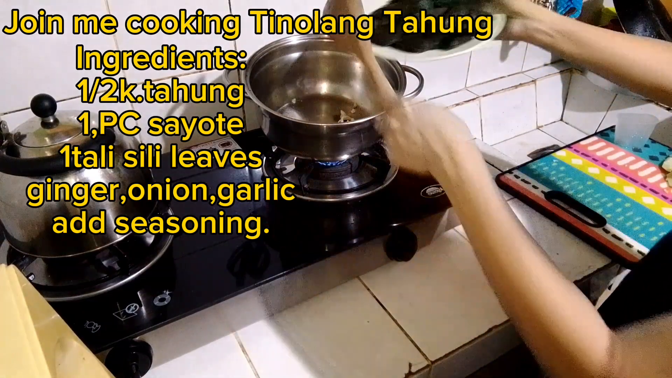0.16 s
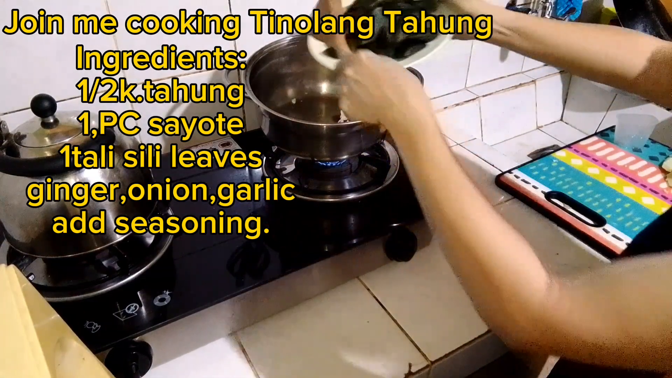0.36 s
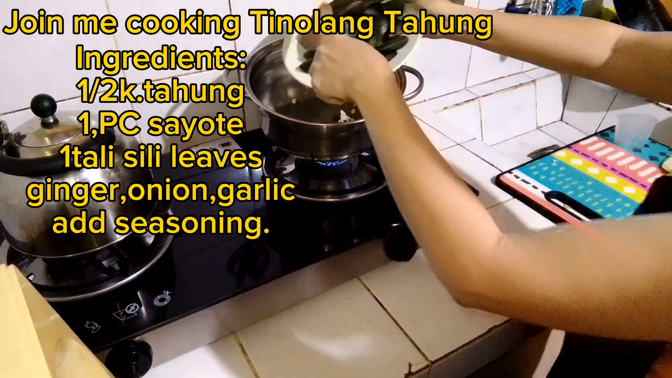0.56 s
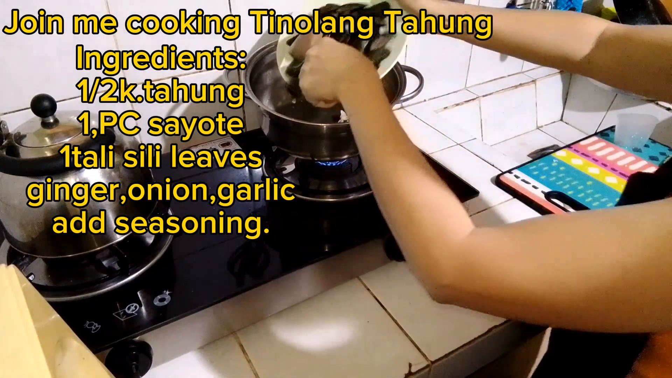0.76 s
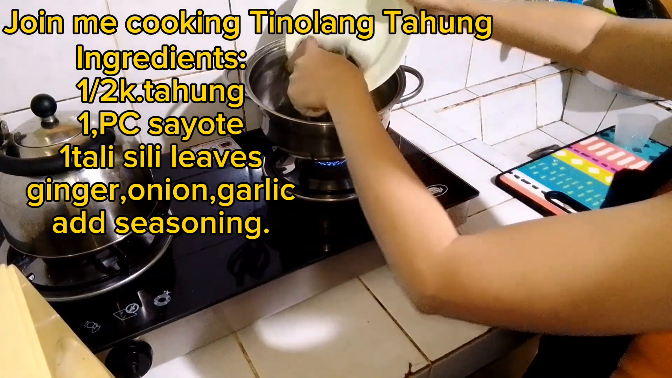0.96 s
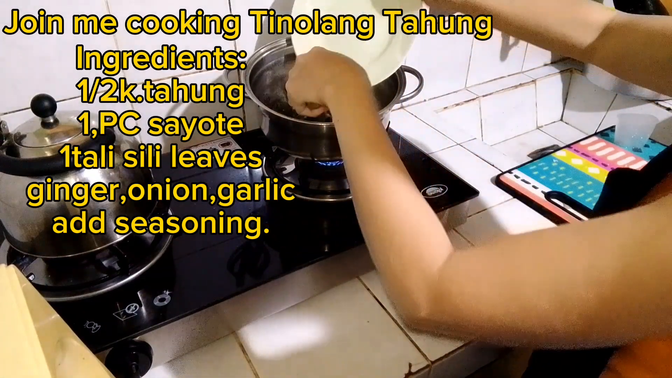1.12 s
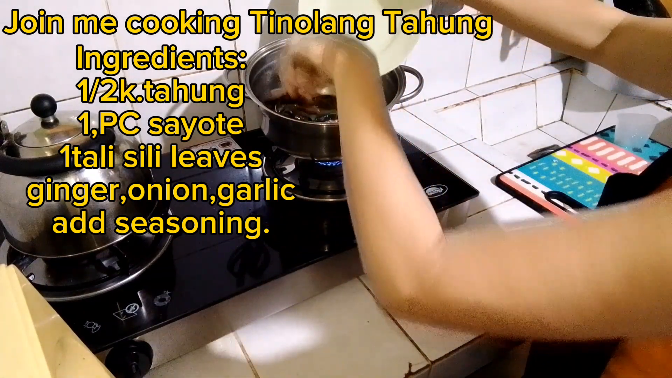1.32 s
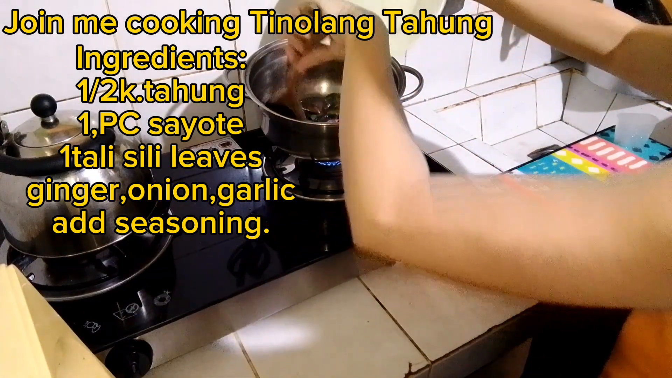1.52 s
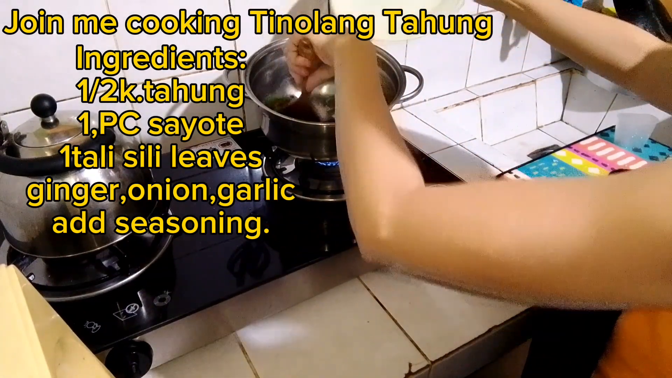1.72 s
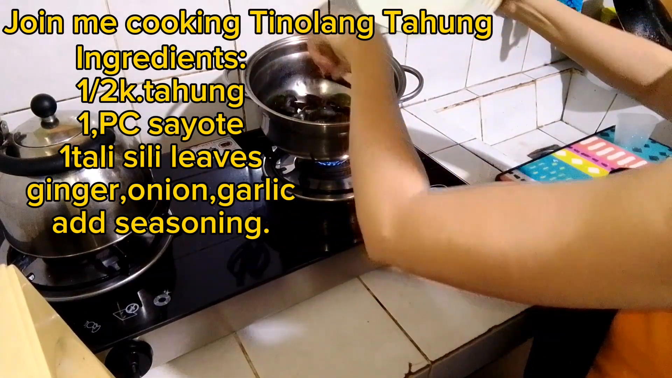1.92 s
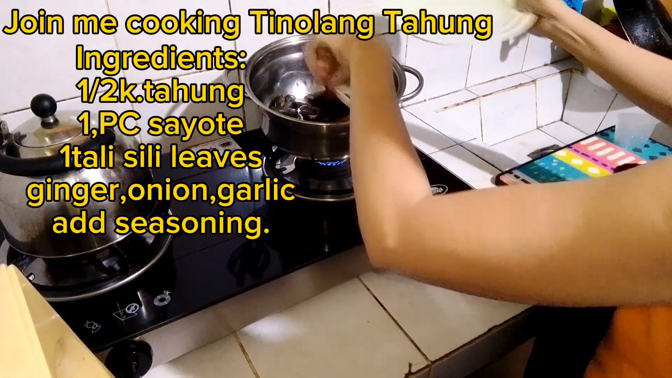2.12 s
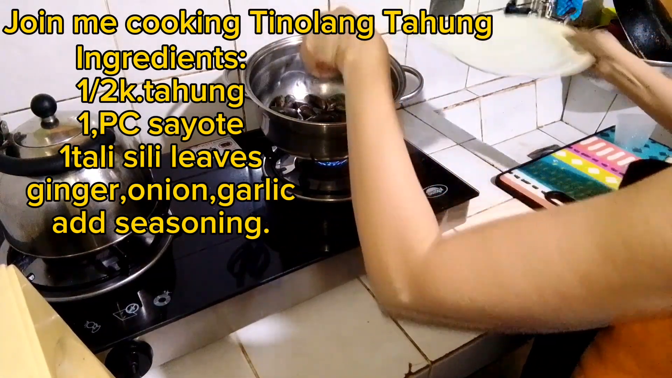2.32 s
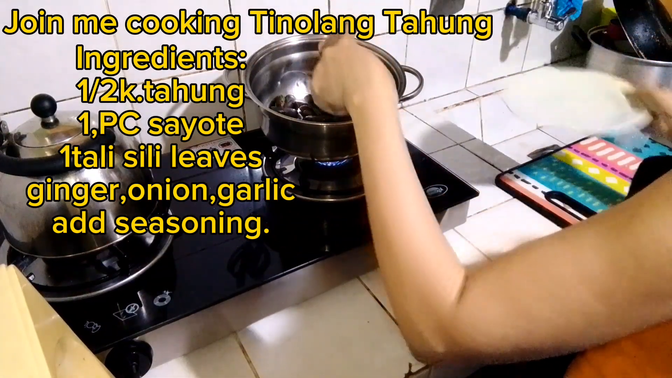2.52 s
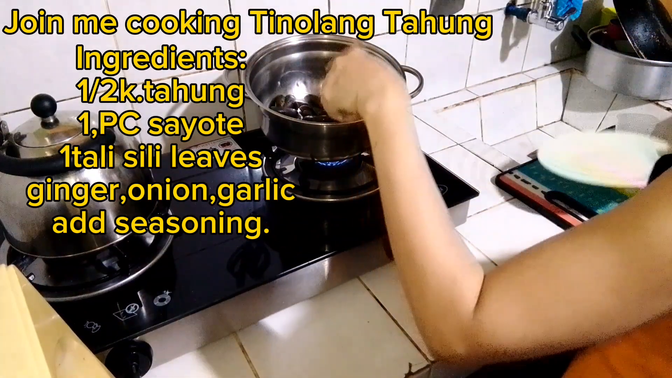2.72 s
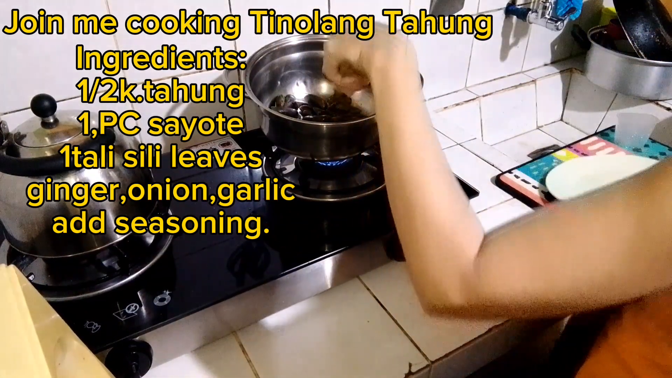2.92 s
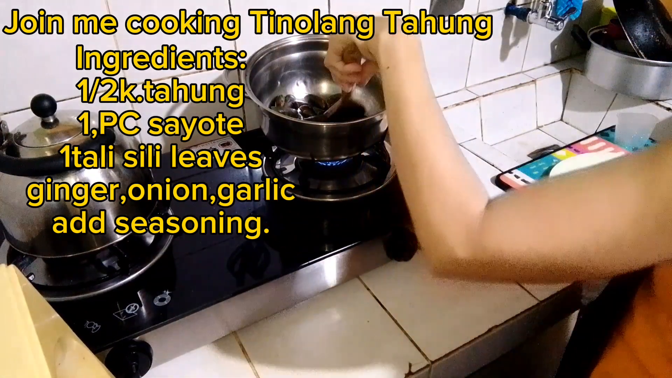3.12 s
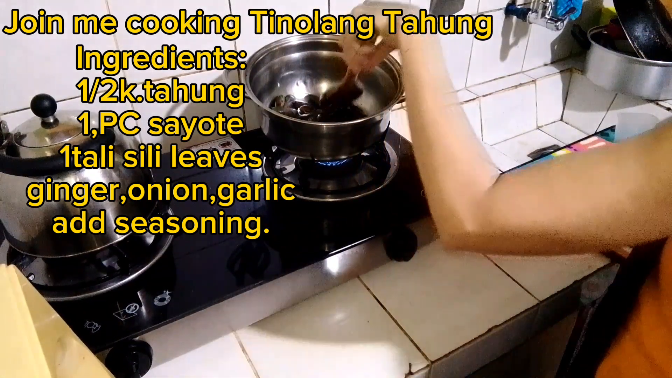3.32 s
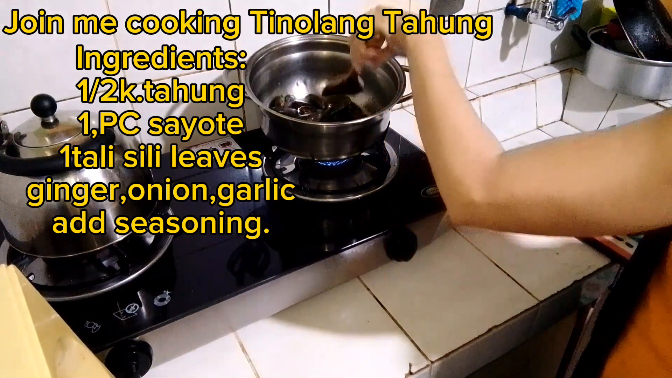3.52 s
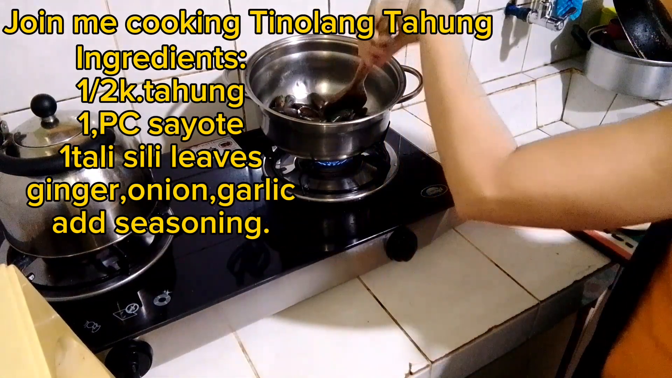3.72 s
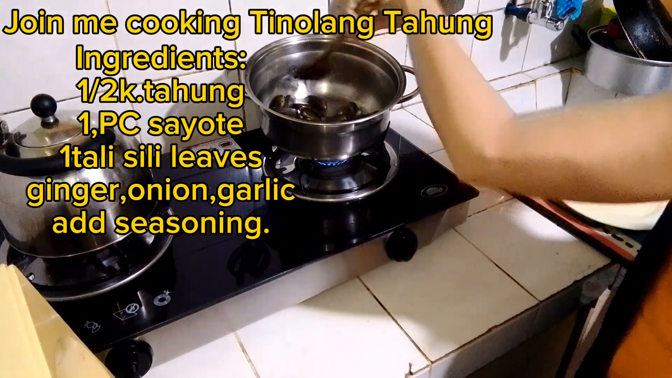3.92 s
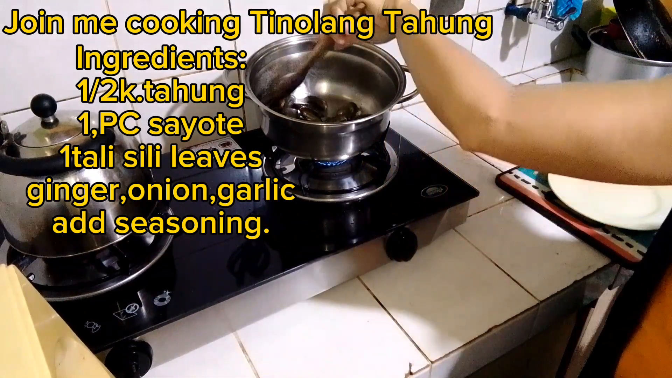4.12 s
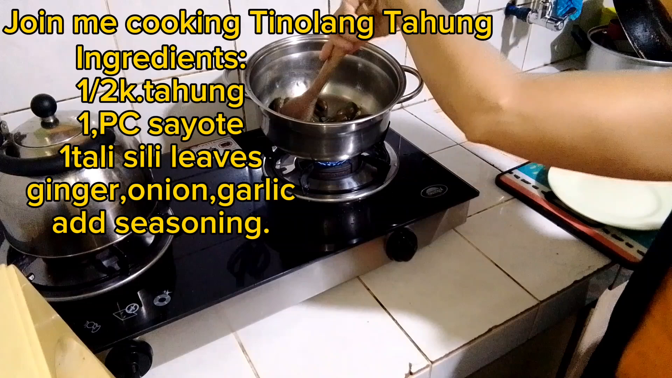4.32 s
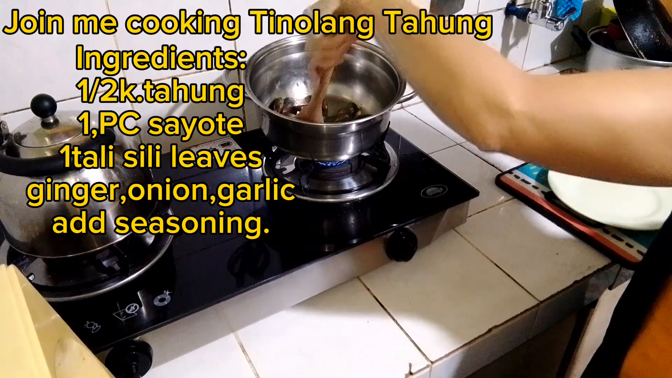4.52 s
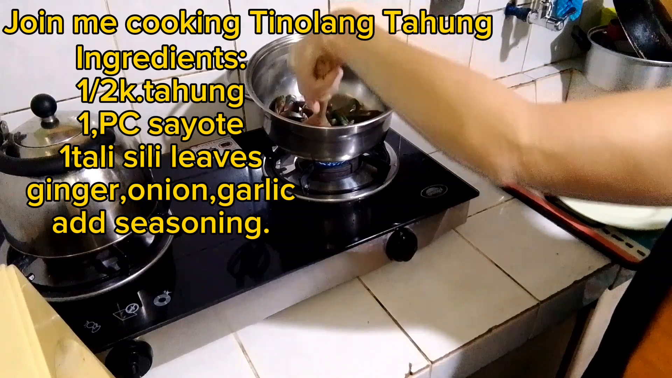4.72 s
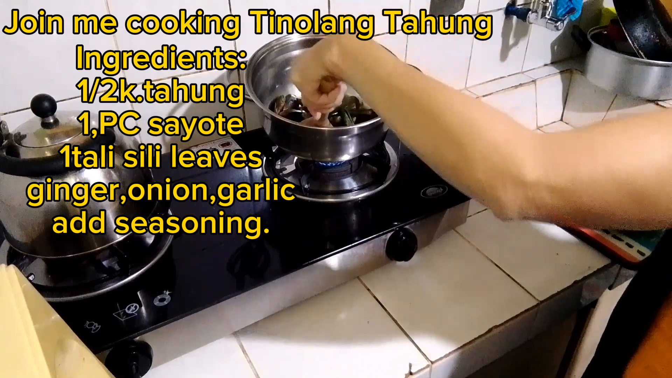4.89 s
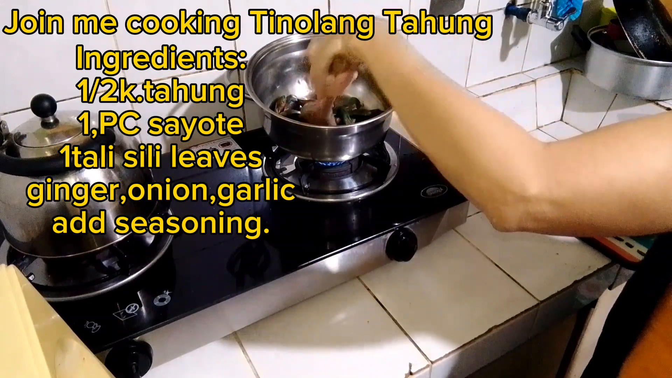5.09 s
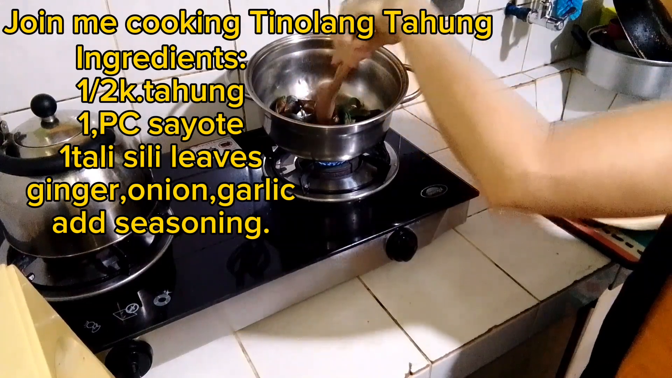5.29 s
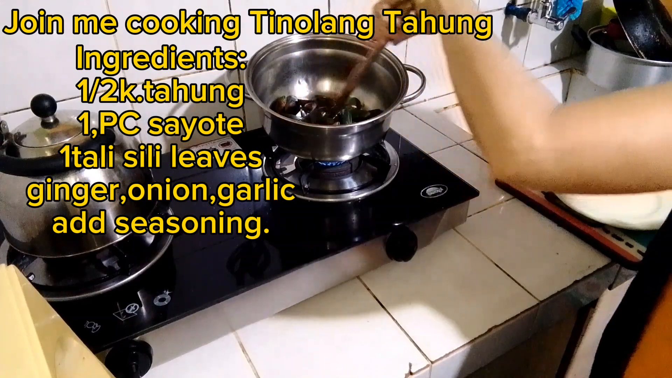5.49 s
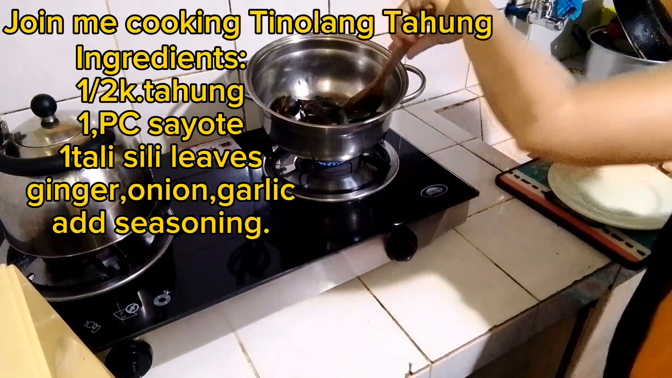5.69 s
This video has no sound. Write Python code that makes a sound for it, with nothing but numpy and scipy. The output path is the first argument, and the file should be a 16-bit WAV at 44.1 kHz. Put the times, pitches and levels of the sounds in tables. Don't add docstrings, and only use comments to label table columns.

```python
import sys
import numpy as np
from scipy import signal
from scipy.fft import rfft, irfft
from scipy.io import wavfile

SR = 44100
rng = np.random.default_rng(int(sys.argv[2]) if len(sys.argv) > 2 else 0)


def dump(signal):
    limited = np.clip(np.atleast_2d(signal).T, -1, 1)
    pcm = np.round(limited * 32767).astype(np.int16)
    wavfile.write(sys.argv[1], SR, pcm)


def volts_from_decibels(level):
    exponent = np.asarray(level, float) / 20
    return 10 ** exponent


N = 253559

# [f/Hz, level/dB, t60/s]
POT_MODES = [(449, -9.5, 0.2), (532.5, 2.5, 0.069), (646, -1, 0.14), (713, 3.5, 0.059), (802, 0, 0.055),
             (860, -2.5, 0.11), (1088, 8.5, 0.03), (1219, 8, 0.036), (1390, 8, 0.01), (1633, -21, 0.029),
             (1542, 1, 0.027), (1740, 15, 0.013), (2040, -10, 0.04)]
# [f/Hz, level/dB, t60/s]
BASE_MODES = [(124, -6, 0.034), (183, -49, 0.052), (227, -16, 0.066), (273.4, -9.5, 0.087),
              (354, -22, 0.095)]
# [f/Hz, level/dB, t60/s]
WALL_MODES = [(2128, -6, 0.066), (2268, -1, 0.043), (2400, -1, 0.05), (2800, -5, 0.058), (3240, -2.5, 0.11),
              (3420, -0.5, 0.068), (3700, -2, 0.044), (3900, -2.5, 0.079), (4130, -11.5, 0.12),
              (4460, -1, 0.092), (4880, -5.5, 0.088), (5370, -3.5, 0.024), (5950, -10.5, 0.083),
              (6350, -1, 0.016)]


def rms_one(x):
    return x / np.sqrt(np.mean(x ** 2) + 1e-20)


def peak_one(x):
    return x / np.abs(x).max()


def butter(x, order, f_hz, kind):
    return signal.sosfilt(signal.butter(order, f_hz, kind, fs=SR, output="sos"), x)


def in_time(rows):
    t_s, *columns = np.transpose(rows)
    return [np.interp(np.arange(N) / SR, t_s, c) for c in columns]


def colour(x, points):
    f_hz, level_db = np.transpose(points)
    grid_hz = np.arange(N // 2 + 1) * SR / N + 1
    gain_db = np.interp(np.log(grid_hz), np.log(f_hz), level_db)
    return rms_one(irfft(rfft(x) * volts_from_decibels(gain_db), N))


def drift(rate_hz):
    r = np.exp(-2 * np.pi * rate_hz / SR)
    wander = signal.lfilter([1], [1, -2 * r, r * r], rng.standard_normal(N + SR))
    return rms_one(wander[SR:])


def ring(force, f_hz, t60_s):
    r = volts_from_decibels(-60 / (max(t60_s, .001) * SR))
    w = 2 * np.pi * f_hz / SR
    return signal.lfilter([0, np.sin(w)], [1, -2 * r * np.cos(w), r * r], force + 1e-18)


def radiated(force, f_hz, t60_s):
    return np.diff(ring(force, f_hz, t60_s), prepend=0)


def struck(modes, force, strengths_db):
    body = 0
    for k, ((f_hz, level_db, t60_s), own_db) in enumerate(zip(modes, strengths_db)):
        body = body + ring(force, f_hz, t60_s) * volts_from_decibels(level_db + own_db) * (-1) ** k
    return peak_one(body)


def grains(per_s, spread_db):
    sizes = volts_from_decibels(spread_db * np.minimum(rng.exponential(1, N), 5)) * rng.choice([-1, 1], N)
    return sizes * (rng.random(N) < per_s / SR)


def fading(t60_s):
    return volts_from_decibels(-60 * np.arange(SR // 3) / SR / max(t60_s, .003))


def add(out, t_s, sound):
    at = round(t_s * SR)
    out[at:at + len(sound)] += sound[:N - at]


def swells(rows, rise_db_per_s, fall_db_per_s):
    t = np.arange(0, N + 32, 32) / SR
    start_s, hold_s, *columns = np.array(rows).T[:, :, None]
    rise_db = -rise_db_per_s * np.maximum(start_s - t, 0)
    fall_db = -fall_db_per_s * np.maximum(t - start_s - hold_s, 0)
    curves = []
    for level_db in columns:
        power = np.sum(volts_from_decibels(level_db + rise_db + fall_db) ** 2, axis=0)
        curves.append(np.interp(np.arange(N) / SR, t, 10 * np.log10(power + 1e-9)))
    return curves


def vigour():
    # [t/s, spitting/dB, fine steam/dB]
    steady_fry = [(0, -39, -36.5), (.62, -39, -37.5), (.7, -35, -39), (.84, -51, -37), (.93, -45, -35),
                  (1.0, -9.5, -16), (1.24, -12, -16.5), (1.3, -21, -19.5), (1.83, -11.5, -9),
                  (2.18, -15.5, -15.5), (2.45, -17, -18), (3.1, -23, -22.5), (3.36, -21.5, -21),
                  (4.23, -20, -16.5), (4.32, -17, -17.5), (5.03, -19, -17), (5.3, -12.5, -11.5),
                  (5.75, -20.5, -16)]
    # [start/s, hold/s, spitting/dB, fine steam/dB]
    flare_rows = [(.645, .01, -44, -32), (.858, 0.018, -14, -40), (.937, 0.0051, -4, -17),
                  (1.0, 0.016, -20, -16), (1.33, 0.083, -17.5, -13), (1.535, 0.012, -11, -30),
                  (1.605, 0.008, -20, -14), (1.7, .01, -12, -22), (2.22, 0.014, -24, -11),
                  (2.283, 0.005, -18, -12), (2.745, 0.025, -20.5, -17), (3.44, .13, -21.5, -15.5),
                  (3.665, 0.024, -17, -16.5), (3.85, 0.17, -21, -16), (4.26, 0.009, -33, -29),
                  (4.719, 0.0056, -30, -16), (5.1, 0.048, -28, -15.5), (5.47, 0.028, -16.5, -11.5),
                  (5.684, .004, -27, -22)]
    flares_db = swells(flare_rows, rise_db_per_s=2500, fall_db_per_s=361)
    return [10 * np.log10(volts_from_decibels(steady_db) ** 2 + volts_from_decibels(flare_db) ** 2)
            for steady_db, flare_db in zip(in_time(steady_fry), flares_db)]


def frying():
    # [f/Hz, level/dB]
    spit_spectrum = [(400, -72), (900, -49), (2000, -14.5), (3000, -3), (4600, 4), (6100, -1.5), (9000, -9),
                     (13000, -36)]
    steam_spectrum = [(5000, -19), (7000, -1), (10000, 0), (11600, -5), (13000, -1)]
    air_hz, air_t60_s, air_db = 1150, 0.0094, -23.5
    spit_db, steam_db = vigour()
    clump = drift(30)

    bursts = grains(8000 * volts_from_decibels(clump), spread_db=-1.0)
    dealt = rng.integers(0, 20, N)
    droplets = 0
    for k, f_hz in enumerate(np.geomspace(600, 12500, 20)):
        droplets = droplets + ring(bursts * (dealt == k), f_hz, 2.67 / f_hz) * np.sqrt(f_hz)

    busy = np.clip((spit_db + 30) / 12, 0, 1)
    pops = grains(70 * busy, spread_db=4.0)
    rattle = signal.lfilter([1], [1, -.985], np.abs(pops)) * rng.standard_normal(N)
    pops = rms_one(butter(pops + volts_from_decibels(-7.5) * rattle, 2, 2500, "high"))

    pot_air = rms_one(radiated(ring(bursts, air_hz, air_t60_s), air_hz, air_t60_s))
    spit = colour(droplets, spit_spectrum) * volts_from_decibels(.5 * clump) + volts_from_decibels(-12.5) * pops + volts_from_decibels(air_db) * pot_air
    steam = colour(grains(12000, spread_db=-7.0), steam_spectrum)
    return spit * volts_from_decibels(spit_db - 1.5) + steam * volts_from_decibels(steam_db - 3 + 0.59 * clump + 1.0 * drift(40))


def big_pops():
    # [t/s, peak/dB]
    pop_rows = [(1.798, -3), (2.1815, 0), (2.29, 0), (2.3646, -4), (2.6483, -3), (2.8012, -4), (3.5665, 0),
                (3.4685, -4), (3.483, -2), (3.5065, -5), (3.5267, -1), (3.6595, -2), (4.0708, -3),
                (4.3312, -3), (4.636, -4), (4.8594, -2), (4.928, -4), (4.721, 1), (4.9816, -1), (5.271, -2),
                (5.6866, 1), (5.3316, -2), (5.521, -2)]
    out = np.zeros(N)
    for t_s, peak_db in pop_rows:
        noise = rng.standard_normal(SR // 3)
        snap = volts_from_decibels(-13) * noise * fading(0.023)
        snap[0] += np.sign(noise[0])
        add(out, t_s, volts_from_decibels(peak_db) * peak_one(butter(snap, 2, [2500, 11000], "band")))
    return out


def clicks():
    # [t/s, peak/dB, ring f/Hz, bright edge/dB]
    pouring = [(.644, -13, 4360, 12), (.7153, -17.5, 3300, -23), (.739, -30, 4400, -25),
               (.7851, -13, 4630, -23), (.8385, 0, 3970, -27), (.863, 3, 3880, -20), (.937, 6, 3240, 7),
               (.9705, -1, 2750, -17), (.9957, 11.5, 6180, -18), (1.0494, 4, 4900, -20),
               (1.1094, 0.5, 3060, -17), (1.2294, -2, 4200, -16), (1.32, -2, 3900, -14),
               (1.3494, -13, 1740, 0), (1.409, 1, 4960, -1), (1.472, -4, 5200, -11),
               (1.524, -2.5, 4850, -22), (1.537, -4, 3500, -7), (1.605, 6.5, 3370, -6),
               (1.7035, 2.5, 5370, -7), (1.9215, 3, 3750, -7), (2.062, 4, 4300, -17), (2.128, 3, 4600, -15),
               (2.176, 6, 4000, -11)]
    settling = [(2.2246, 3.5, 4940, -14), (2.283, 3.5, 4900, -6), (2.647, -0.5, 3240, -8),
                (2.756, 0, 4570, 2), (2.7897, -0.5, 4850, -8), (2.8514, -7, 1750, -15),
                (2.8837, -6.5, 4830, -16), (2.954, -4.5, 4900, 14), (3.064, 3, 2800, -35),
                (3.171, -4.5, 4740, 3), (3.241, -5.5, 3420, -20), (3.271, 1.5, 1930, -25),
                (3.3064, -4, 2430, -19)]
    stirring = [(3.405, 1, 3800, -15), (3.5663, -0.5, 3440, 12), (3.674, 0, 4400, -19),
                (3.758, 3, 1730, -22), (3.8222, 2, 4600, -8), (3.87, -0.5, 3270, -14),
                (3.959, 1.5, 4340, -5), (4.2634, -2, 7100, 15.5), (4.292, 0.5, 2700, -19),
                (4.507, 2.5, 2060, -18), (4.7192, -2.5, 7250, -10), (5.1515, 2.5, 3320, -13),
                (5.223, 4.5, 3250, -28), (5.2998, 1, 5060, -19), (5.354, -4, 4950, -3),
                (5.4043, -1, 3560, -11), (5.47, 1.5, 4300, -11), (5.5823, 2, 4400, -28),
                (5.6626, 0.5, 2230, -2), (5.6856, -9, 4930, 5)]
    out = np.zeros(N)
    tick = peak_one(np.diff(ring(fading(.003)[:SR // 6], 4200, .0015), 2))
    fade = fading(0.052)[:SR // 6]
    for t_s, peak_db, f_hz, edge_db in pouring + settling + stirring:
        dull, sharp = fade * rng.standard_normal((2, SR // 6))
        shell = peak_one(radiated(dull, f_hz, 0.0052))
        crack = peak_one(butter(sharp, 2, 5500, "high"))
        wall = struck(WALL_MODES, dull, 3.3 * rng.standard_normal(len(WALL_MODES)))
        add(out, t_s, volts_from_decibels(peak_db - 6.5) * (shell + volts_from_decibels(edge_db - 10.5) * crack + volts_from_decibels(-5.5) * wall))
        add(out, t_s, volts_from_decibels(peak_db - 3) * tick)
    return butter(out, 2, 900, "high")


def clinks():
    # [t/s, peak/dB, f/Hz, t60/s]
    clink_rows = [(0.736, -21, 4360, 0.1), (.74, -24, 2220, 0.04), (.842, -7.5, 4980, 0.03),
                  (0.867, -3, 4370, 0.06), (0.943, -15, 3200, 0.048), (.95, -9.5, 2197, 0.82),
                  (.97, -0.5, 2735, 0.055), (0.973, -2.5, 5670, 0.021), (1.02, -6, 2236, 0.067),
                  (1.031, -5, 3240, 0.14), (1.05, -18, 4880, 0.11), (1.119, -12, 3186, 0.23),
                  (1.225, -13.5, 2800, 0.26), (1.347, -11.5, 1740, 0.043), (1.375, -14, 1740, 0.092),
                  (4.504, -10.5, 2800, 0.036), (4.71, -17, 2250, 0.032)]
    out = np.zeros(N)
    for t_s, peak_db, f_hz, t60_s in clink_rows:
        shake = rng.standard_normal(SR // 3) * fading(0.079)
        add(out, t_s, volts_from_decibels(peak_db) * peak_one(radiated(shake, f_hz, t60_s)))
    return out


def shaken(modes, contacts, level_db):
    body = 0
    for f_hz, mode_db, t60_s in modes:
        force = contacts * rng.standard_normal(N) * volts_from_decibels(mode_db + 2.1 * drift(9))
        body = body + ring(force, f_hz, t60_s)
    return volts_from_decibels(level_db) * rms_one(body)


def tumbling():
    # [start/s, hold/s, rumble of pot/dB, rattle of shell on steel/dB]
    shifts = [(.715, 0.15, -37.5, -23), (.839, 0.074, -28, -8), (.938, 0.28, -13.5, -10.5),
              (1.27, 0.091, -20, -14.5), (1.45, 0.26, -19.5, -15.5), (1.76, 0.11, -20.5, -12),
              (1.85, 0.033, -18, -12), (1.93, .15, -19.5, -16), (2.09, 0.054, -16.5, -14),
              (2.2, 0.84, -45, -20.5), (3.064, 0.0071, -4, -10), (3.272, 0.046, -11.5, -14),
              (3.4, 0.22, -50, -25), (3.67, 0.13, -15, -16), (3.82, 0.069, -15.5, -18.5),
              (3.9, 0.18, -28, -19), (4.14, 0.078, -27.5, -22.5), (4.28, 0.094, -17, -9.5),
              (4.44, 0.072, -24.5, -13.5), (4.506, 0.01, -35, -9.5), (4.56, 0.37, -26.5, -23),
              (4.8, 0.025, -39, -38), (4.9, 0.2, -36, -17), (5.1, 0.11, -24, -14.5),
              (5.25, 0.21, -28, -13.5), (5.46, 0.17, -28.5, -18), (5.62, 0.15, -31.5, -17.5)]
    rumble_db, rattle_db = swells(shifts, rise_db_per_s=5000, fall_db_per_s=200)
    full = np.clip((np.arange(N) / SR - 1.7) * 5, 0, 1)
    pot_contacts = grains(900 * volts_from_decibels(1.5 * drift(20)), spread_db=2.5)
    wall_contacts = grains(2500 * volts_from_decibels(1.5 * drift(20)), spread_db=2.5)
    rumble = shaken(POT_MODES + BASE_MODES, pot_contacts, rumble_db - 8.5)
    rattle = shaken(WALL_MODES, wall_contacts, rattle_db - 9.5 - 1 * full)
    scrape = rms_one(butter(wall_contacts, 2, [1300, 3300], "band"))
    return rumble + rattle + volts_from_decibels(rattle_db - 15.0 + 0.5 * full) * scrape


def knocks():
    # [t/s, peak/dB, thud/dB, length/s, main ring f/Hz]
    knock_rows = [(0.932, -17, 3, 0.21, 710), (1.133, -5, -27, 0.12, 820), (1.186, 0.5, -13, 0.33, 670),
                  (1.34, -2.5, -22, 0.057, 707), (1.376, -4, -31, 0.2, 683), (1.665, -15, 0.5, 0.074, 810),
                  (1.752, -12, -11, 0.21, 1160), (1.844, -7.5, -25, 0.11, 1090),
                  (2.103, -4.5, -15, 0.15, 1076), (3.064, 4.5, -5, 0.073, 960),
                  (3.273, -12, 0.5, 0.16, 1020), (3.307, -20, -6, 0.073, 1040),
                  (3.677, -2, -8.5, 0.13, 520), (3.814, -7.5, -5.5, 0.24, 430),
                  (4.14, -17.5, -9, 0.15, 535), (4.263, -14.5, -16, 0.47, 1150),
                  (4.359, -10, -21, 0.2, 1090), (4.512, -6.5, -41, 0.2, 1114),
                  (4.798, -11, -9.5, 0.25, 500), (5.101, -10.5, -35, 0.12, 1030),
                  (5.172, -6.5, -44, 0.35, 560), (5.33, -12.5, -37, 0.3, 576),
                  (5.528, -12, -18, 0.068, 533), (5.66, -9, -39, 0.094, 1050)]
    out = np.zeros(N)
    for t_s, peak_db, thud_db, length_s, f_hz in knock_rows:
        force = rng.standard_normal(SR // 3) * fading(length_s)
        own_db = 2.1 * rng.standard_normal(len(POT_MODES + BASE_MODES))
        pot = struck(POT_MODES, force, own_db)
        thud = volts_from_decibels(thud_db) * struck(BASE_MODES, force, own_db[len(POT_MODES):])
        spot = volts_from_decibels(-3.0) * peak_one(radiated(force, f_hz, 0.046))
        burst = volts_from_decibels(-7) * peak_one(butter(force, 1, [400, 4500], "band"))
        add(out, t_s, volts_from_decibels(peak_db - 9) * (pot + thud + spot + burst))
    return out


def burner():
    # [f/Hz, level/dB]
    roar_spectrum = [(15, 0), (85, -42), (120, -1), (250, -8), (800, -5), (1600, -7.5), (3000, -13),
                     (5000, -49)]
    # [f/Hz, width/Hz, level/dB]
    hum_lines = [(245, 20, -60), (357, 8, -53.5)]
    # [t/s, f/Hz, level/dB]
    whistle_track = [(0, 1170, -41.5), (.06, 1150, -52), (.27, 1080, -65), (.31, 1068, -45),
                     (.37, 1065, -53), (.45, 1065, -75)]
    out = volts_from_decibels(-50) * colour(rng.standard_normal(N), roar_spectrum)
    for f_hz, width_hz, level_db in hum_lines:
        t60_s = np.log(1000) / np.pi / width_hz
        out = out + volts_from_decibels(level_db) * rms_one(np.diff(ring(rng.standard_normal(N + 1), f_hz, t60_s)))
    f_hz, level_db = in_time(whistle_track)
    sounding = np.arange(N) < whistle_track[-1][0] * SR
    return out + sounding * volts_from_decibels(level_db) * np.sin(2 * np.pi * np.cumsum(f_hz) / SR)


def room(x):
    tail = butter(rng.standard_normal(SR // 3) * fading(0.6), 1, 5000, "low")
    tail = np.r_[np.zeros(SR // 250), tail / np.sqrt(np.sum(tail ** 2))]
    return signal.fftconvolve(x, tail)[:N]


def gain_control():
    # [t/s, depth/dB]
    ducks = [(0.879, 5), (1.24, -2), (1.544, 3.5), (1.615, 0), (1.71, 3), (2.184, 4), (2.295, 2.5),
             (2.8, 2), (3.575, 2), (4.728, 4), (4.99, 2), (5.17, 3), (5.408, 6), (5.692, 3)]
    duck_s, recover_s = 0.0033, 0.16
    loss_db = np.zeros(N)
    after_s = np.arange(SR) / SR
    shape = (1 - np.exp(-after_s / duck_s)) * np.exp(-(after_s / recover_s) ** 2)
    for t_s, depth_db in ducks:
        add(loss_db, t_s, depth_db * shape)
    return volts_from_decibels(-loss_db)


def scene():
    hits = butter(clicks() + clinks() + knocks() + tumbling(), 4, 140, "high")
    mono = frying() + big_pops() + hits + volts_from_decibels(-12.5) * room(hits) + burner()
    return np.tile(mono, (2, 1))


def band_limit(x):
    return signal.sosfilt(signal.butter(12, 13190, fs=SR, output="sos"), x)


def record(dry):
    cutoff_hz, offset = 12720, -.0009
    top_cut = signal.ellip(12, .5, 70, cutoff_hz, fs=SR, output="sos")
    x = signal.sosfilt(top_cut, dry * gain_control())
    return band_limit(np.clip(x + offset, -1, 1))


dry = scene()
out = record(dry)
dump(out)
```